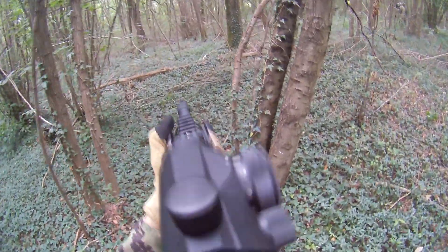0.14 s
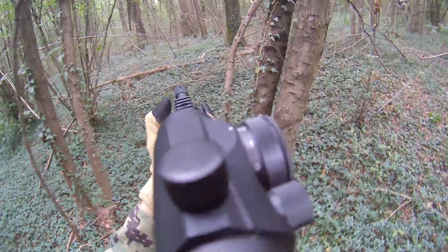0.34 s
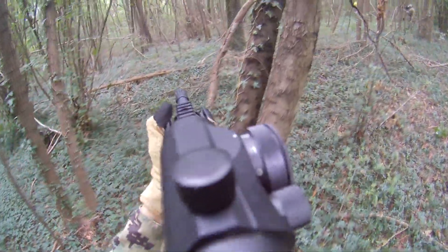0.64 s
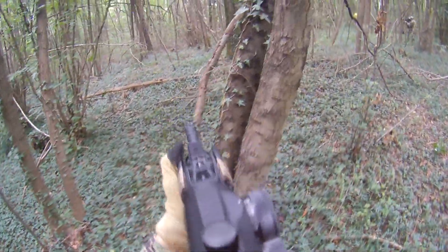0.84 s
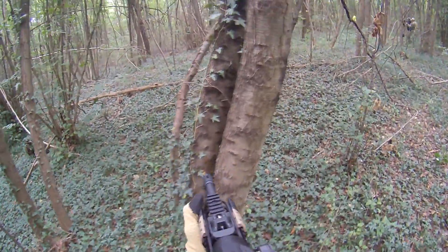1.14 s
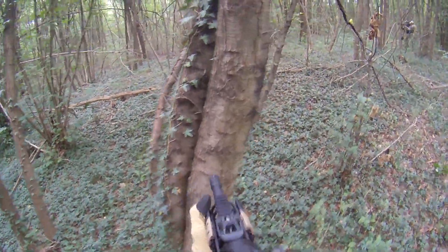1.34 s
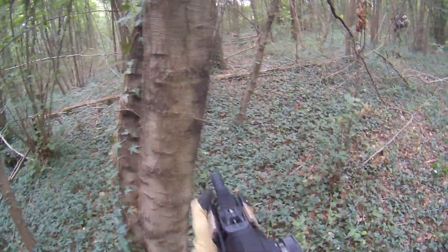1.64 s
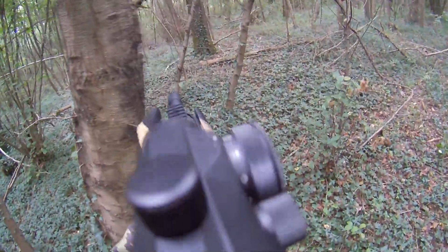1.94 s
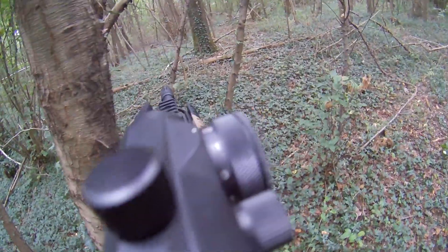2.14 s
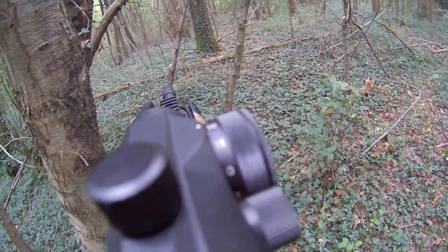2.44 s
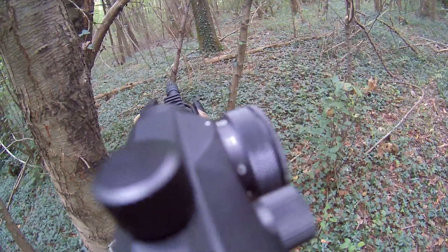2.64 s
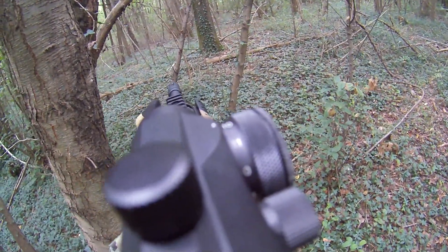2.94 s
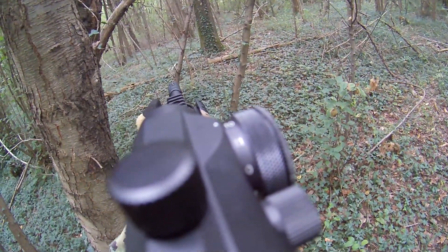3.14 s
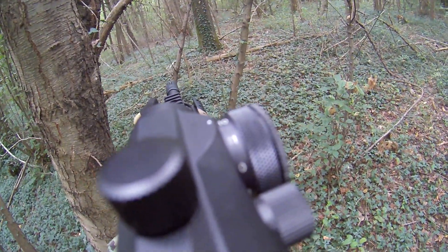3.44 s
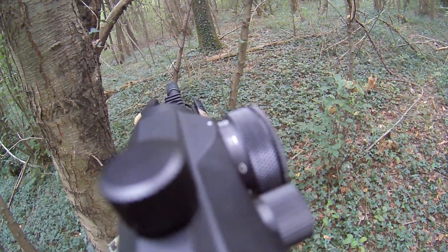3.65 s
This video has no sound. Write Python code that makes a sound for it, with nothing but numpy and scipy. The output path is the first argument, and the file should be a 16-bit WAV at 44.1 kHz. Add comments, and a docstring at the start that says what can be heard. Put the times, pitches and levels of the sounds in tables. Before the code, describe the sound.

Close to the microphone, an airsoft rifle rattles off a brief burst, its motor whining. Fainter groups of three shots tick from far off among the trees before the near rifle lets loose a longer, evenly spaced burst.

```python
"""Over still woodland air a distant gun ticks out three-round bursts that scatter among the trees.
Right by the microphone an electric airsoft rifle fires two automatic bursts. In each cycle the motor
sags as it winds the spring, the gears rasp and whine, air puffs out and the piston slams home,
exciting the modes of the body. After the first burst a ratchet clicks and the spring rings on."""
import sys
import numpy as np
from scipy import signal
from scipy.fft import rfft, irfft, next_fast_len
from scipy.io import wavfile
from scipy.ndimage import uniform_filter1d, minimum_filter1d, map_coordinates

SR = 44100
rng = np.random.default_rng(int(sys.argv[2]) if len(sys.argv) > 2 else 0)


def store_pcm(level_fs):
    """Save levels as 16-bit WAV."""
    pcm = np.round(np.clip(level_fs, -1, 1) * 32767).astype(np.int16)
    wavfile.write(sys.argv[1], SR, np.atleast_2d(pcm).T)


N = 167580


def amp(db):
    """Amplitude ratio of a level in decibels."""
    return 10 ** (np.asarray(db) / 20)


def seconds(length):
    """A uniformly sampled time axis."""
    return np.arange(int(length * SR)) / SR


def add(out, s, sound):
    """Superposition: a sound joins the mix at time s."""
    i = int(np.clip(round(s * SR), 0, N))
    out[i:i + len(sound)] += sound[:N - i]


def wobble(rate):
    """Random modulation: a smooth curve through `rate` Gaussian values a second."""
    knots = rng.standard_normal(int(N * rate / SR) + 4)
    return map_coordinates(knots, [np.arange(N) * rate / SR])


def response(spectrum, size=4096):
    """Minimum-phase impulse response of unit energy, by folding the cepstrum."""
    hz, db = np.transpose(spectrum)
    gain = amp(np.interp(np.log(np.fft.rfftfreq(size, 1 / SR) + 1), np.log(hz), db))
    cepstrum = irfft(np.log(gain))
    cepstrum[1:size // 2] *= 2
    cepstrum[size // 2 + 1:] = 0
    impulse = irfft(np.exp(rfft(cepstrum)))
    return impulse / np.linalg.norm(impulse)


def noise(spectrum, envelope=np.ones(N)):
    """Source and filter: white noise under an envelope is shaped by a spectrum."""
    source = envelope * rng.standard_normal(len(envelope))
    return signal.fftconvolve(source, response(spectrum))[:len(source)]


# Spectra of the still air and of the low rumble (frequency [Hz], relative level [dB])
AIR_SPECTRUM = [(25, 2), (60, -5), (130, -10), (250, -13), (500, -13.5), (1000, -13), (2000, -13.5),
                (4500, -13), (8000, -13.5), (11000, -19), (14000, -69)]
RUMBLE_SPECTRUM = [(20, 4.5), (45, -10.5), (90, -10), (200, -40), (500, -28), (2000, -76)]

def still_air(air_db=-61, rumble_db=-64):
    """Ambient noise: faint air and rumble, each with a slow random amplitude modulation."""
    air = amp(air_db + wobble(12.3)) * noise(AIR_SPECTRUM)
    rumble = amp(rumble_db + 3.3 * wobble(11)) * noise(RUMBLE_SPECTRUM)
    return air + rumble


# Faint rings of the rifle's main spring (time [s], level [dB])
SPRING_ONSETS = [(0, -67), (0.813, -61)]

def main_spring(hz=1040, t60=1):
    """Free vibration: the settled spring rings on in one lightly damped mode."""
    out, t = np.zeros(N), seconds(0.81)
    for s, db in SPRING_ONSETS:
        add(out, s, amp(db - 60 * t / t60) * np.sin(2 * np.pi * hz * t))
    return out


# Spectrum of the sound scattered by the trees (frequency [Hz], relative level [dB])
SCATTER_SPECTRUM = [(100, -40), (450, -25.5), (790, -12), (1300, -21), (2000, -12.5), (2800, -12.5),
                    (4800, -12), (6100, -3.5), (6800, -3.5), (7500, 1), (7900, 5.5), (8300, 0), (9700, -3),
                    (11300, -13.5), (12100, -14), (13700, -23)]

def scatter(t60, grain_db=0):
    """Diffuse scattering: fine echoes merge into exponentially decaying noise of unit energy."""
    t = seconds(.6)
    spray = noise(SCATTER_SPECTRUM, amp(grain_db * wobble(391)[:len(t)] - 60 * t / t60))
    return spray / np.linalg.norm(spray)


# Spectrum of the far gun's tick (frequency [Hz], relative level [dB])
TICK_SPECTRUM = [(100, -11), (470, -18), (790, 0), (1250, -20.5), (1600, -6.5), (2000, 2.5), (2600, -7),
                 (3600, -23), (4400, -8), (6500, -10), (7900, 10), (9500, -4), (11300, -20), (12200, -23),
                 (13700, -8)]
# Shots of the far gun (time [s], relative level [dB])
FAR_TICKS = [(0.1125, -30.5), (0.1666, -31.5), (0.2159, -31.5), (0.822, -37), (.875, -35), (0.9258, -32),
             (1.0175, -32.5), (1.0722, -31), (1.1221, -31.5), (1.222, -31.5), (1.2762, -30.5), (1.326, -30),
             (1.4227, -30.5), (1.475, -30), (1.5265, -30), (1.6142, -30), (1.6676, -30.5), (1.7181, -30.5),
             (1.7992, -30), (1.8525, -29), (1.903, -30.5), (2.0129, -30), (2.0683, -29), (2.1186, -30),
             (2.1969, -37.5), (2.255, -38), (2.2847, -29), (2.3395, -30), (2.3908, -29.5), (2.5191, -28)]
FAR_GAIN_DB = 17.5

def far_gun(unused_s=0.0091, dull_cutoff_hz=2200):
    """Direct and scattered sound: a sharp, bright tick with a duller copy blurred into it, and a tail from the
    trunks."""
    out, tick = np.zeros(N), -response(TICK_SPECTRUM)
    dull_tick = signal.lfilter(*signal.butter(1, dull_cutoff_hz, fs=SR), tick)
    for s, db in FAR_TICKS:
        gain = amp(db + FAR_GAIN_DB)
        zing = amp(-1.5) * scatter(t60=.005)
        splash = amp(-3) * scatter(t60=.026)
        trunks = amp(5) * scatter(t60=.64, grain_db=1.8)
        add(out, s, gain * tick)
        add(out, s, gain * (zing + splash + trunks))
        add(out, s + rng.normal(0, .00055), gain * dull_tick)
    return out


# Narrow modes of the gearbox shell (frequency [Hz], bandwidth [Hz], relative level [dB])
SHELL_MODES = [(2354, 270, -13), (2985, 136, -7.5), (3213, 78, -5.5), (3436, 74, -9), (4260, 80, -1.5),
               (4445, 55, -11), (5000, 110, -7.5), (5105, 110, -10.5), (5500, 250, -3.5), (6240, 140, -7.5),
               (7240, 98, 4), (7340, 130, -2.5), (8360, 93, -4), (8930, 190, 2)]

def gearbox_shell():
    """Forced vibration: noise drives modes that decay at rates set by their bandwidths."""
    t = seconds(.06)
    impulse = sum(amp(db) * width * np.exp(-np.pi * width * t) * np.cos(2 * np.pi * hz * t)
                  for hz, width, db in SHELL_MODES)
    return signal.fftconvolve(rng.standard_normal(N), impulse / np.linalg.norm(impulse))[:N]


# Spectra of the gearbox and of its harsher rasp at start-up (frequency [Hz], relative level [dB])
GEARBOX_SPECTRUM = [(30, -27), (300, -30.5), (550, -18.5), (800, -11), (1200, -10.5), (1600, -17.5),
                    (2100, -14), (2400, -11.5), (2750, -12.5), (3200, -8), (4200, -7), (5400, -6.5),
                    (6800, -4), (7250, 0.5), (8200, 2), (9200, -5.5), (10500, -9), (11700, -16),
                    (13700, -23)]
STARTUP_SPECTRUM = [(1000, -27), (2200, -3.5), (3500, 0), (6500, 1.5), (9000, -1), (14000, -20)]
SETTLE_S = 0.31  # time constant of the extra level at the start of a burst

def gear_rasp(age, phase, load):
    """Mesh noise: modulated at the tooth rate, it is louder under load and early in a burst."""
    pulsing = 1 + 0.15 * np.cos(phase)
    teeth = noise(GEARBOX_SPECTRUM, pulsing / np.sqrt(np.mean(pulsing ** 2)))
    level_db = -31.5 + 5 * np.exp(-age / SETTLE_S) + 2.1 * load + wobble(300)
    bite = amp(-34) * np.exp(-age / 0.43) * noise(STARTUP_SPECTRUM)
    return amp(level_db) * (teeth + amp(-3) * gearbox_shell()) + bite


# Partials of the gear whine (multiple of the tooth rate, relative level [dB])
MESH_HARMONICS = [(1, -43.5), (2, -60), (3, -38), (4, -45)]

def gear_train(trigger, shots, release, mesh_hz=874.4, sag_hz=115.1, start_hz=1161):
    """Motor loading: the tooth rate falls as the spring is wound and recovers after each shot."""
    t = np.arange(N) / SR
    age = np.abs(t - trigger)
    cycle_edges = [trigger, *shots, 2 * shots[-1] - shots[-2]]
    cycle = np.interp(t, cycle_edges, np.arange(len(cycle_edges))) % 1
    load = np.interp(cycle, [0, .3, .92, 1], [.6, .004, .99, .99])
    hz = mesh_hz - sag_hz * load ** 1.4
    hz *= 1 + .009 * (wobble(150) + wobble(14))
    hz *= 1 - .15 * np.exp(-age / .084)  # the motor gathers speed
    start = np.exp(-((t - trigger - .008) / .012) ** 2)  # brief unloaded start
    phase = 2 * np.pi * np.cumsum(hz + (start_hz - hz) * start) / SR
    chirp = amp(-39) * start * np.sin(phase + wobble(250))
    whine = sum(amp(db + 1.8 * wobble(70)) * np.sin(k * phase) for k, db in MESH_HARMONICS)
    whine *= np.interp(cycle, [0, .3, .45, .85, 1], [.22, .13, .8, .47, .12])
    spin_up = 1 - np.exp(-np.maximum(t - trigger, 0) / .013)
    coast = amp(-226 * np.maximum(t - release, 0))
    stop = np.clip((release + .08 - t) / .01, 0, 1)
    return spin_up * coast * stop * (gear_rasp(age, phase, load) + whine) + chirp


# Modes of the rifle body (frequency [Hz], relative level [dB], decay time T60 [s])
BODY_MODES = [(270, -17, 0.03), (395, -10, 0.029), (545, -16, 0.034), (708, -1.5, 0.017), (742, -19, 0.041),
              (899.5, -2.5, 0.029), (1102, -10.5, 0.029), (1155, -14.5, 0.0083), (1379, -2.5, 0.02),
              (1597, -7.5, 0.021), (1997, -6.5, 0.024), (3375, -3.5, 0.011), (4800, -9, 0.038)]

def impact(ring_db, crack_db, hardness_hz=4000, crack_t60=0.033, attack_s=0.00077):
    """Impact excitation: the gearbox cracks and the body rings, less brightly under a soft blow."""
    t = seconds(.1)
    ring = 0
    for hz, db, t60 in BODY_MODES:
        envelope = amp(db + rng.normal(0, .7) - 60 * t / t60)
        rolloff = np.sqrt(1 + (hz / hardness_hz) ** 4)
        ring += envelope / rolloff * np.sin(2 * np.pi * hz * rng.normal(1, .003) * t)
    radiation = signal.butter(2, 313, 'high', fs=SR, output='sos')  # a small body radiates little bass
    ring = signal.sosfilt(radiation, ring * (1 - np.exp(-t / attack_s)))
    crack = noise(GEARBOX_SPECTRUM, amp(-60 * t / crack_t60))
    return amp(ring_db) * ring + amp(crack_db) * crack


def air_puff(hz=122, t60=0.03, rise_s=.0025, kick_s=.005):
    """Pressure pulse: air leaves the barrel as the rifle kicks, a damped thud and one low push."""
    t = seconds(.1)
    thud = np.sin(2 * np.pi * hz * t) * amp(-60 * t / t60) * (1 - np.exp(-t / rise_s))
    kick_age = np.maximum(t - .5 / hz, 0) / kick_s
    kick = (kick_age > 0) * (1 - kick_age / 2) * np.exp(-kick_age)
    return amp(-26) * (thud - amp(-13) * kick)


# Near bursts (trigger time [s], first shot [s], period [s], start-up lag [s], shots, release time [s])
RIFLE_BURSTS = [(.311, .396, .0748, .002, 5, .708), (2.556, 2.6082, .07428, .0063, 17, 3.9)]
# Blows in a cycle (time from the shot [s], ring gain [dB], crack gain [dB], hardness cutoff [Hz])
CYCLE_IMPACTS = [(-.0085, -31.5, -30, 1510), (-.002, -22.5, -46, 450), (.0030, -19, -27.5, 3470),
                 (.0093, -21.5, -32, 1200), (0.02, -48, -16, 4770)]

def rifle(accent_db=5.5):
    """Periodic excitation: the running gears bring a puff and the same five blows at every shot."""
    out = np.zeros(N)
    blows = [(delay, impact(*blow)) for delay, *blow in CYCLE_IMPACTS]
    for trigger, first, period, lag, count, release in RIFLE_BURSTS:
        k = np.arange(count)
        shots = first + k * period + lag * (1 - np.exp(-2 * k))  # even once the motor settles
        out += gear_train(trigger, shots, release)
        add(out, trigger + .0019, impact(ring_db=-50, crack_db=-27))  # the trigger clicks
        for s in shots:
            force = amp(accent_db * np.exp(-(s - first) / SETTLE_S))  # early shots hit harder
            add(out, s - .005, force * air_puff())
            for delay, blow in blows:
                jitter_s, vary_db = rng.normal(0, [.00012, 1])
                add(out, s + delay + jitter_s, force * amp(vary_db) * blow)
    return out


# Clicks of the ratchet (time [s], ring gain [dB], crack gain [dB])
RATCHET_CLICKS = [(.734, -61, -27), (.746, -62, -26), (.761, -62, -33), (0.771, -54, -30.5),
                  (0.787, -67, -35), (0.8153, -44, -28.5), (0.832, -65, -41)]

def ratchet():
    """Light, hard impacts: the ratchet clicks as the gears run down after the first burst."""
    out = np.zeros(N)
    for s, ring_db, crack_db in RATCHET_CLICKS:
        add(out, s, impact(ring_db, crack_db, crack_t60=0.035))
    return out


# Snaps among the far shots (time [s], relative level [dB])
SNAP_ONSETS = [(.953, -38), (1.6685, -29), (1.856, -25), (1.9405, -37), (2.287, -35), (2.3775, -31)]

def far_snaps():
    """Noise transients: a fast decay and a bright spectrum give thin snaps."""
    out = np.zeros(N)
    for s, db in SNAP_ONSETS:
        add(out, s, amp(db + FAR_GAIN_DB) * scatter(t60=.022))
    return out


def scene():
    """Superposition: both guns over still air, with the trees' reverberation of the near rifle."""
    near = main_spring() + rifle() + ratchet()
    reverberation = amp(-24) * signal.fftconvolve(near, scatter(t60=.54))[:N]
    return (still_air() + far_gun() + near + reverberation + far_snaps())[None]


def record(dry, ceiling_db=-17, hold_s=0.0005, top_hz=13950):
    """Peak and band limiting: a fast gain holds the peaks down, then a low-pass cuts the top."""
    hold = int(hold_s * SR)
    gain = np.minimum(1, amp(ceiling_db) / (np.abs(dry) + 1e-9))
    limited = dry * uniform_filter1d(minimum_filter1d(gain, hold), hold)
    size = next_fast_len(N + SR // 2)
    passband = np.fft.rfftfreq(size, 1 / SR) < top_hz
    return irfft(rfft(limited, size) * passband, size)[..., :N]


dry = scene()
out = record(dry)
store_pcm(out)
```